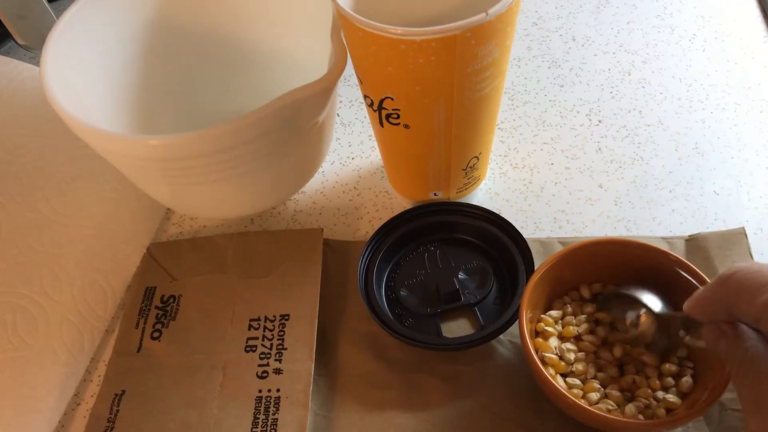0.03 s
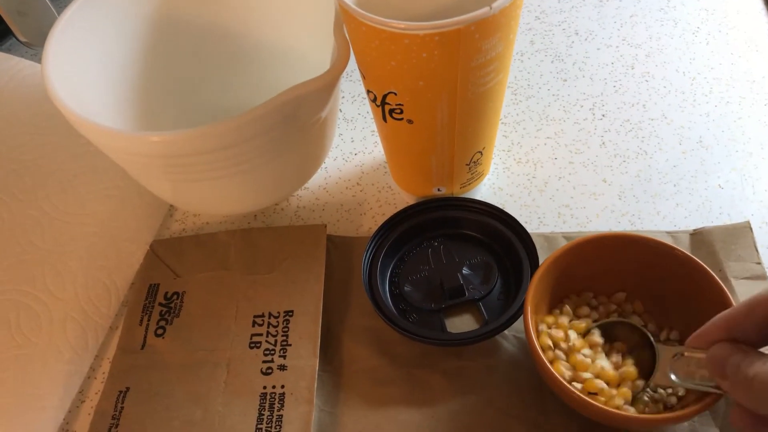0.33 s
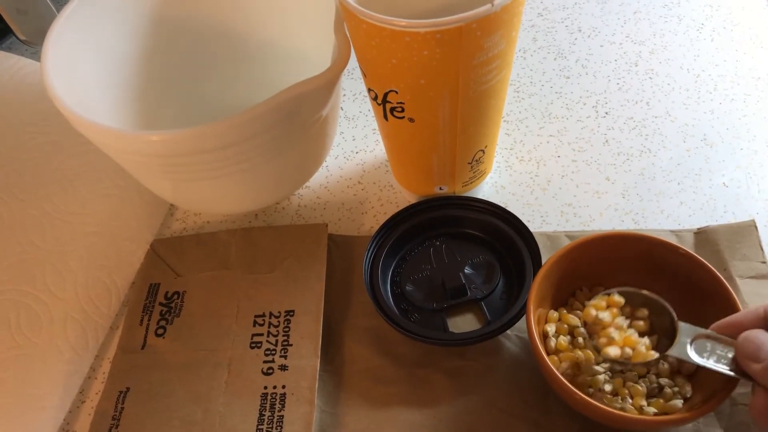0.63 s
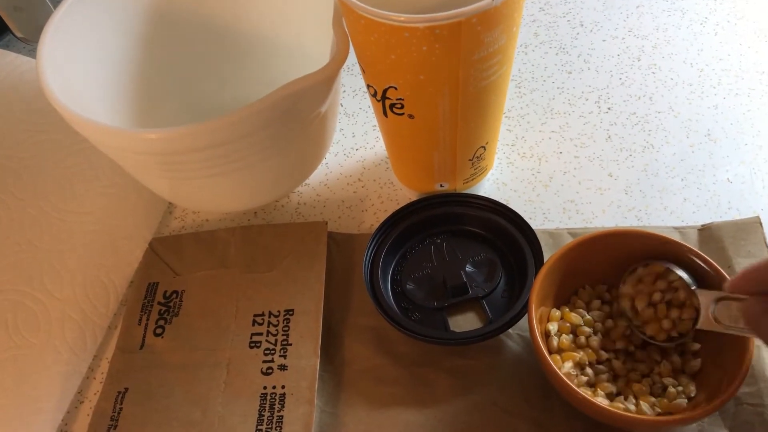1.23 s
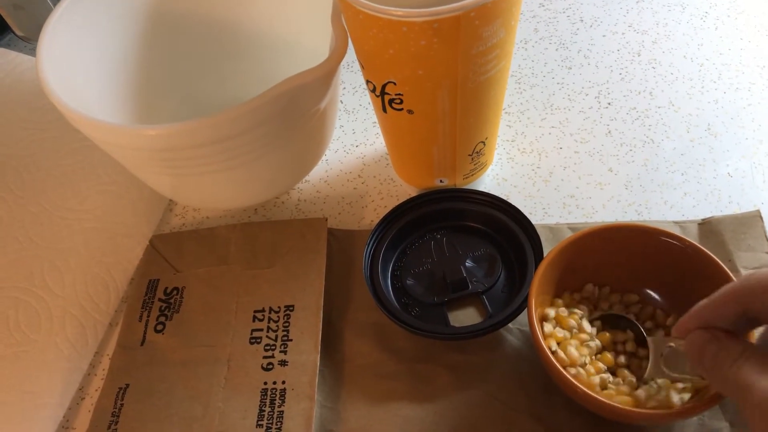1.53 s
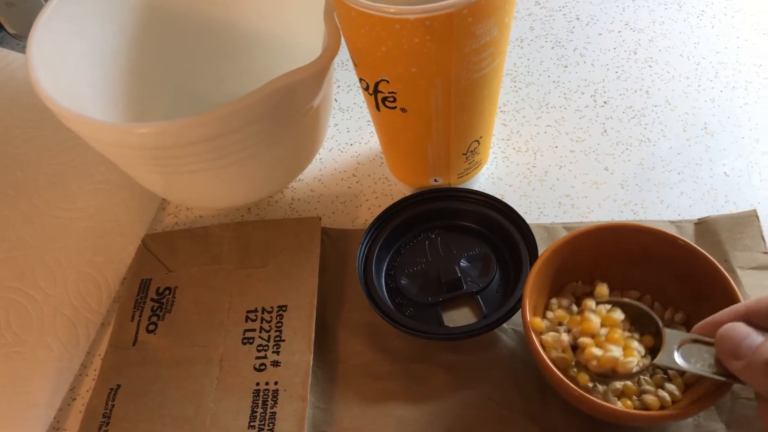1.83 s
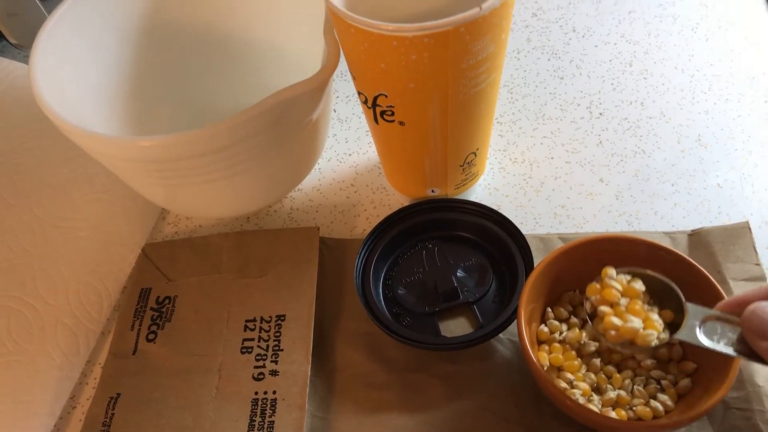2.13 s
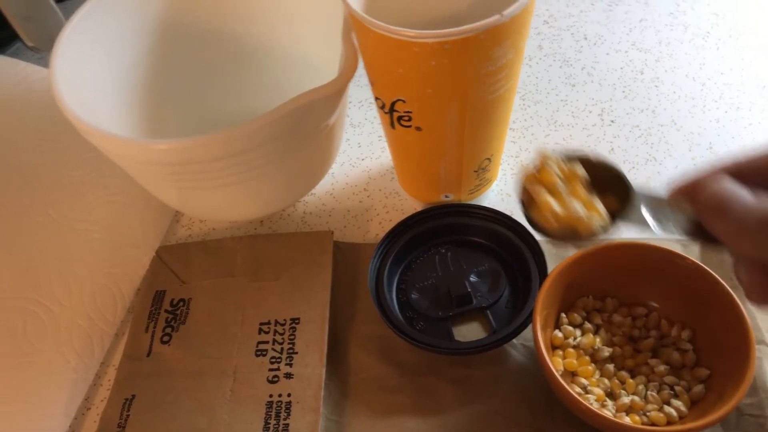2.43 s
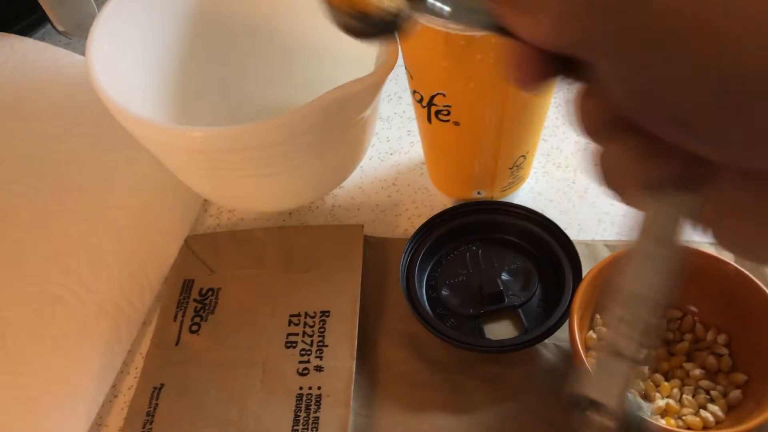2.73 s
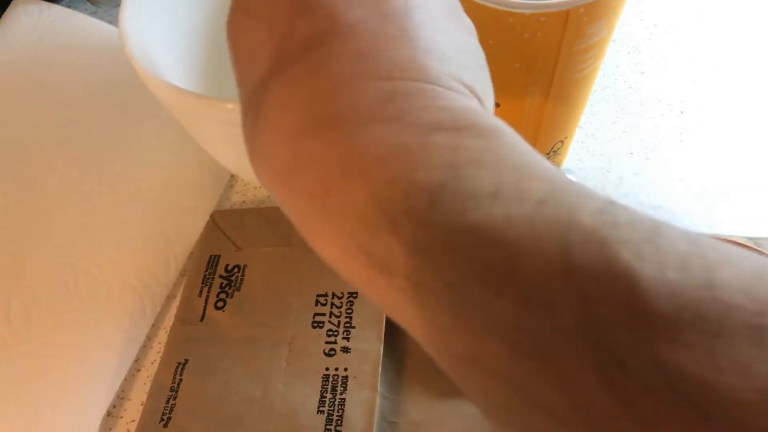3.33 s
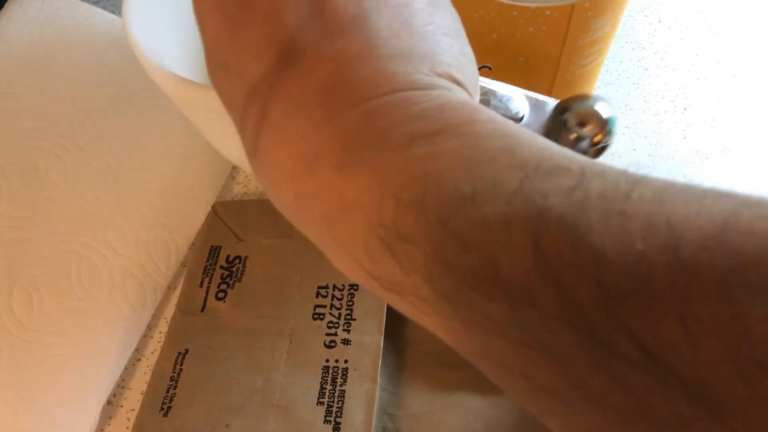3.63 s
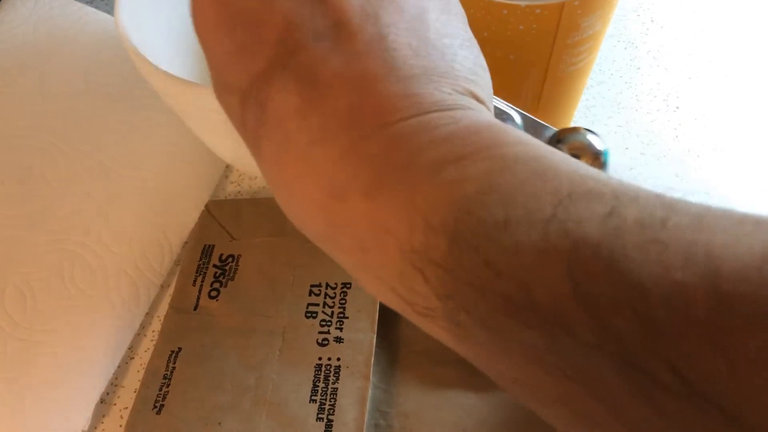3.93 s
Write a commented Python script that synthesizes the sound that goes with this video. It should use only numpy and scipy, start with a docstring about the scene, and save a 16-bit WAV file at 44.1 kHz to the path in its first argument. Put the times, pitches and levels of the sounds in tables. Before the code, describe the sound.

Close up in a quiet kitchen, dry kernels rattle and crunch under two scoops of a metal spoon. After a pause, measuring spoons clash brightly as the kernels drop softly into a jug. An appliance hums underneath.

```python
"""Dry popcorn kernels crunch and tick over a low appliance hum as a steel measuring spoon digs twice
into a small bowl on a kitchen counter. The crunch is thousands of tiny clicks of kernel on kernel.
The spoon knocks and scrapes the bowl, sings faintly as kernels rub its rim, and squeaks up the wall.
An arm rustles across and tips the scoop into a jug: kernels patter in dully while the other spoons
on the ring clash and jangle brightly."""
import sys
import numpy as np
from scipy import signal
from scipy.fft import rfft, irfft
from scipy.io import wavfile

SR = 44100
rng = np.random.default_rng(int(sys.argv[2]) if len(sys.argv) > 2 else 0)


def transcribe(u):
    """Save the signal u as a 16-bit wav file named by the first command-line argument.

    u: samples, shape (n,) or (channels, n), limited to [-1, 1]; the rate is SR.
    q: integer samples, one column per channel.
    """
    v = np.clip(np.atleast_2d(u).T, -1, 1)
    q = np.round(v * 32767).astype(np.int16)
    wavfile.write(sys.argv[1], SR, q)


N = 176400
TIME = np.arange(N) / SR


def from_db(db):
    """Turn decibels into a gain to multiply by."""
    return 10 ** (np.asarray(db) / 20)


def rms_one(x):
    """Scale a signal so that its average strength (rms) is 1."""
    return x / np.sqrt(np.mean(x ** 2) + 1e-20)


def level(rows):
    """A gain that glides through (time_s, level_db) rows and is silent outside them."""
    time_s, level_db = np.transpose(rows)
    return from_db(np.interp(TIME, time_s, level_db, left=-120, right=-120))


def lowpass(x, cutoff_hz, order=2):
    """Keep slow wiggles and weaken those faster than the cutoff."""
    return signal.sosfilt(signal.butter(order, cutoff_hz, fs=SR, output="sos"), x)


def through(x, response):
    """Play a signal through an object, given that object's response to one click."""
    return signal.fftconvolve(x, response / np.linalg.norm(response))[:N]


def colour(points, size=8192):
    """A click whose lows and highs follow (pitch_hz, level_db) rows."""
    hz, db = np.transpose(points)
    bins_hz = np.maximum(np.arange(size // 2 + 1) * SR / size, 1)
    gains = from_db(np.interp(np.log(bins_hz), np.log(hz), db))
    cepstrum = irfft(np.log(gains))
    # keeping only the first half packs the energy at the start of the click
    response = irfft(np.exp(rfft(2 * cepstrum[:size // 2], size)))
    return response / np.linalg.norm(response)


def ringing(modes, detune_hz=0, uneven_db=0, scatter=False):
    """A struck object's fading tones (modes); each drops 60 dB in its ring_s seconds."""
    t = TIME[:SR // 4]
    tones = 0
    for hz, db, ring_s in modes:
        fade = from_db(db + uneven_db * rng.normal() - 60 * t / ring_s)
        cycles = (hz + detune_hz * rng.normal()) * t + scatter * rng.random()
        tones += fade * np.cos(2 * np.pi * cycles)
    return tones


def rattled(contacts, modes):
    """Every contact strikes each mode with a random strength of its own."""
    return sum(from_db(db) * through(contacts * rng.standard_normal(N), ringing([(hz, 0, ring_s)]))
               for hz, db, ring_s in modes)


def body(contacts, points, modes, ring_s, click_db, ring_db):
    """The click of each contact plus the ringing that it wakes."""
    clicks = from_db(click_db) * through(contacts, colour(points))
    return clicks + rattled(contacts, [(hz, db + ring_db, ring_s) for hz, db in modes])


def place(events, sound):
    """Play a fresh sound() at every (start_s, level_db) row."""
    out = np.zeros(N + SR)
    for start_s, level_db in events:
        wave, start = sound(), int(start_s * SR)
        out[start:start + len(wave)] += from_db(level_db) * wave
    return out[:N]


def burst(decay_s):
    """A dying flurry of tiny contacts."""
    return rng.standard_normal(SR // 5) * np.exp(-TIME[:SR // 5] / decay_s)


def grains(per_s, spread_db):
    """Clicks of uneven size at random moments."""
    sizes = from_db(spread_db * np.minimum(rng.exponential(1, N), 4))
    signs = rng.choice([-1, 1], N)
    return rms_one(sizes * signs * (rng.random(N) < per_s / SR))


def rough_tone(hz, width_hz):
    """An unsteady tone, as from rubbing or flow; more width makes it more like a hiss."""
    wander = lowpass(rng.standard_normal((2, N)), width_hz)
    phase = 2 * np.pi * np.cumsum(hz * np.ones(N)) / SR
    return rms_one(wander[0] * np.cos(phase) + wander[1] * np.sin(phase))


def flutter(depth_db):
    """A gain that wavers at random around 1, as loose things catch and let go."""
    wobble = rms_one(lowpass(rng.standard_normal(N), cutoff_hz=31))
    return rms_one(from_db(depth_db * np.clip(wobble, -2, 2)))


# the appliance's steady tones: pitch_hz, level_db
HUM = [(48.4, -48.5), (58.5, -57), (101.5, -61)]
# lows and highs of still room air: pitch_hz, level_db
AIR_COLOUR = [(25, -18), (55, 5), (150, -10), (350, -5.5), (520, -14), (1100, -19), (7000, -40),
              (14000, -37.5)]
def background():
    """An appliance hums and drones over the soft noise of room air."""
    hum = sum(np.sqrt(2) * from_db(db) * np.sin(2 * np.pi * (hz * TIME + rng.random()))
              for hz, db in HUM)
    drone = from_db(-60.5) * rough_tone(hz=300.8, width_hz=11)
    air = from_db(-53) * through(rng.standard_normal(N), colour(AIR_COLOUR))
    return hum + drone + air


# how hard the kernels are stirred, one table per movement: time_s, level_db
FIRST_SCOOP = [(0, -28.5), (.07, -40), (.105, -23.5), (.15, -27), (.235, -37.5), (.42, -32), (.59, -49),
               (.82, -62), (.9, -42), (.97, -62.5), (1.13, -72)]
SECOND_SCOOP = [(1.17, -44.5), (1.245, -36), (1.27, -61), (1.295, -37.5), (1.355, -38.5), (1.383, -30.5),
                (1.45, -32.5), (1.49, -22.5), (1.55, -37), (1.65, -34), (1.871, -37), (1.96, -49),
                (2.08, -66)]
TIPPING = [(3.188, -68), (3.28, -38), (3.35, -54)]
# single kernels snap against spoon and bowl: start_s, level_db
TICKS = [(.04, -21), (.098, -46), (.1072, -21), (.1395, -5), (.2916, -38), (.3133, -20.5), (.3445, -38),
         (.4468, -28), (.5013, -26.5), (.5447, -22.5), (.604, -27.5), (.7565, -37), (.7775, -35),
         (.8698, -36), (.903, -30), (1.0156, -34), (1.067, -35), (1.2935, -19.5), (1.380, -23),
         (1.403, -16.5), (1.5007, -9.5), (1.644, -20), (1.696, -19), (1.9423, -31), (1.961, -33),
         (3.1555, -32), (3.2699, -50)]
# lows and highs of one kernel's click: pitch_hz, level_db
KERNEL_COLOUR = [(200, -38), (1600, -6.5), (3000, -2.5), (6200, 3.5), (15800, -0.5)]
# short ringing tones of the filled bowl: pitch_hz, level_db
KERNEL_MODES = [(3560, -13), (5850, -4.5), (6900, -11.5), (8050, -5), (10150, -12.5), (12530, 0.5),
                (14700, -6.5)]
def kernels():
    """Kernels crunch past each other in clusters, single ones snap, and all ring the filled bowl."""
    stirring = (level(FIRST_SCOOP) + level(SECOND_SCOOP) + level(TIPPING)) * flutter(depth_db=2.5)
    crunch = grains(per_s=3100, spread_db=4) * stirring
    ticks = place(TICKS, lambda: burst(decay_s=0.0022))
    return body(crunch + ticks, KERNEL_COLOUR, KERNEL_MODES, ring_s=0.036, click_db=-5, ring_db=-10.5)


def counter_thud(start_s=0.013, level_db=-27.5, pitch_hz=79, ring_s=0.078):
    """The hand nudges the counter, which gives one low, quickly fading tone."""
    t = TIME[:SR]
    thud = from_db(-60 * t / ring_s) * np.sin(2 * np.pi * pitch_hz * t)
    return place([(start_s, level_db)], lambda: thud)


# the spoon grinds over the bottom of the bowl: time_s, level_db
GRINDING = [(0, -78), (.2, -45), (.57, -73), (.66, -53), (.8, -103), (1.21, -46), (1.43, -77), (1.51, -42),
            (1.78, -51.5), (2.03, -92)]
# the spoon knocks the bowl on the counter: start_s, level_db
KNOCKS = [(.183, -27.5), (.629, -35), (1.463, -20.5), (1.4675, -16), (1.501, -29)]
# lows and highs of a knock: pitch_hz, level_db
KNOCK_COLOUR = [(250, -12.5), (650, -8), (1500, 3.5), (5000, 1), (16000, -24.5)]
# the bowl's hollow tones: pitch_hz, level_db
KNOCK_MODES = [(645, -9), (840, -1), (991, -9.5), (1220, -2), (1500, 1.5), (1800, -0.5), (2490, -4.5)]
def bowl():
    """The spoon scrapes and knocks the bowl, which answers with a short, hollow ring."""
    scrape = grains(per_s=3000, spread_db=2) * level(GRINDING)
    knocks = place(KNOCKS, lambda: burst(decay_s=0.0065))
    return body(scrape + knocks, KNOCK_COLOUR, KNOCK_MODES, ring_s=0.033, click_db=-3.5, ring_db=-8.5)


# how hard kernels rub the spoon's rim, one table per scoop: time_s, level_db
FIRST_SINGING = [(.18, -50), (.43, -44.5), (.73, -58)]
SECOND_SINGING = [(1.55, -47.5), (1.81, -39.5), (1.99, -51)]
# strikes on the rim: start_s, level_db
SPOON_PINGS = [(.545, -36), (1.82, -39), (1.878, -31.5), (1.9425, -34)]
# tones of the spoon when it rings freely: pitch_hz, level_db, ring_s
SPOON_MODES = [(2019, -14, .2), (5190, 0, .25), (9258, -3, .18), (14077, -9, .11)]
def spoon_ring():
    """The steel scoop sings unevenly as kernels rub it, and pings when its rim is struck."""
    rubs = grains(per_s=260, spread_db=2) * (level(FIRST_SINGING) + level(SECOND_SINGING))
    damped = [(hz, db, ring_s * 0.61) for hz, db, ring_s in SPOON_MODES]   # kernels shorten the ring
    song = rattled(rubs, damped)
    pings = place(SPOON_PINGS, lambda: ringing(SPOON_MODES, scatter=True))
    return (song + pings) * flutter(depth_db=2)


# path of the squeak's lower tone: time_s, pitch_hz, level_db
SQUEAK = [(1.18, 9420, -61), (1.237, 8220, -33.5), (1.264, 6520, -52)]
def spoon_squeak(width_hz=430):
    """The spoon's edge rubs up the wall of the bowl and squeaks in two falling tones."""
    time_s, pitch_hz, level_db = np.transpose(SQUEAK)
    glide_hz = np.interp(TIME, time_s, pitch_hz)
    lower = rough_tone(glide_hz, width_hz)
    upper = from_db(4.5) * rough_tone(1.2 * glide_hz, width_hz)
    return level(list(zip(time_s, level_db))) * (lower + upper)


# the rustle swells and fades: time_s, level_db
RUSTLE = [(2.8, -56), (2.87, -51), (3.1, -62.5)]
# its lows and highs: pitch_hz, level_db
RUSTLE_COLOUR = [(300, -4), (850, -0.5), (1750, -6), (2300, -31)]
def arm_rustle():
    """Tiny, dull clicks blur into a soft rustle as the arm reaches across."""
    return through(grains(per_s=3100, spread_db=4) * level(RUSTLE), colour(RUSTLE_COLOUR))


# the hanging spoons clash: start_s, level_db
CLASHES = [(3.3553, -24.5), (3.3847, -19), (3.405, -23.5), (3.4285, -30), (3.4924, -23.5), (3.5508, -28),
           (3.704, -32), (3.8511, -29.5), (3.9544, -37.5)]
# strength of the lighter touches between clashes: time_s, level_db
CHATTER = [(3.36, -36), (3.48, -33), (3.56, -30.5), (3.62, -30), (3.8, -37), (3.99, -46)]
# the hanging spoons' tones, levels relative to each other: pitch_hz, level_db
JANGLE_MODES = [(6955, -45), (7198, -37), (7270, -44), (7436, -48), (8930, -41), (9238, -42), (9453, -43),
                (10326, -44), (10950, -46), (11084, -44), (11445, -43), (12317, -47), (12527, -48),
                (13022, -44), (13781, -49), (14093, -40), (14546, -45), (15079, -49)]
# lows and highs of a clash's hiss: pitch_hz, level_db
CLASH_COLOUR = [(500, -2), (4000, -29), (6200, -16), (7500, 3.5)]
def jangle(touches_per_s=130, attack_s=0.0024, free_ring_s=0.17, touching_ring_s=0.055):
    """Clashes and light chatter ring the hanging spoons, which buzz briefly while they touch."""
    time_s, level_db = np.transpose(CHATTER)
    touch_s = time_s[0] + (np.arange(200) + rng.random(200)) / touches_per_s
    touch_s = touch_s[touch_s < time_s[-1]]
    contacts = list(CLASHES) + list(zip(touch_s, np.interp(touch_s, time_s, level_db)))
    loudest_db = max(db for _, db in JANGLE_MODES)
    free = [(hz, db - loudest_db, free_ring_s) for hz, db in JANGLE_MODES]
    touching = [(hz, db, touching_ring_s) for hz, db in JANGLE_MODES]
    attack = 1 - np.exp(-TIME[:SR // 4] / attack_s)
    rings = place(contacts, lambda: attack * ringing(free, detune_hz=13.8, uneven_db=4.5, scatter=True))
    flurry = place(contacts, lambda: burst(decay_s=0.017))
    buzz = from_db(-5.5) * through(flurry, ringing(touching))
    hiss = from_db(-2) * through(flurry, colour(CLASH_COLOUR))
    return from_db(2) * rings * flutter(depth_db=2) + buzz + hiss


# how hard kernels patter into the jug: time_s, level_db
POUR = [(3.36, -82), (3.64, -60), (4.0, -66)]
# lows and highs of a landing: pitch_hz, level_db
POUR_COLOUR = [(80, -6.5), (300, 13), (2000, -19), (9000, -40.5)]
def pour():
    """Kernels land in the jug with dull taps of very uneven size."""
    return through(grains(per_s=500, spread_db=16) * level(POUR), colour(POUR_COLOUR))


# the largest spoon's ring swells and fades: time_s, level_db
LARGE_SPOON_RING = [(3.42, -57), (3.535, -39), (3.6, -48), (3.9, -55)]
# its deeper tones: pitch_hz, level_db, ring_s
LARGE_SPOON_MODES = [(3482, -3, 0.098), (5360, -5.5, 0.05)]
def large_spoon():
    """Many small touches keep the largest spoon ringing; the longer the ring, the purer the tone."""
    tones = sum(from_db(db) * rough_tone(hz, width_hz=np.log(1000) / (np.pi * ring_s))
                for hz, db, ring_s in LARGE_SPOON_MODES)
    return level(LARGE_SPOON_RING) * tones


def kitchen(x, ring_s=0.17, delay_s=0.004):
    """The room adds a short, slightly dull echo."""
    tail = rng.standard_normal(N) * from_db(-60 * TIME / ring_s) * (TIME > delay_s)
    echo = lowpass(through(x, tail[:SR]), cutoff_hz=6000, order=1)
    return x + from_db(-7.5) * echo


def scene():
    """Scooping, then tipping, heard close by over the hum, in one channel."""
    scooping = kernels() + counter_thud() + bowl() + spoon_ring() + spoon_squeak()
    tipping = arm_rustle() + jangle() + pour() + large_spoon()
    return (background() + kitchen(scooping + tipping))[None]


def record(dry, cutoff_hz=15900):
    """The very highest treble is cut off steeply."""
    return signal.sosfilt(signal.ellip(12, .1, 80, cutoff_hz, fs=SR, output="sos"), dry)


dry = scene()
out = record(dry)
transcribe(out)
```